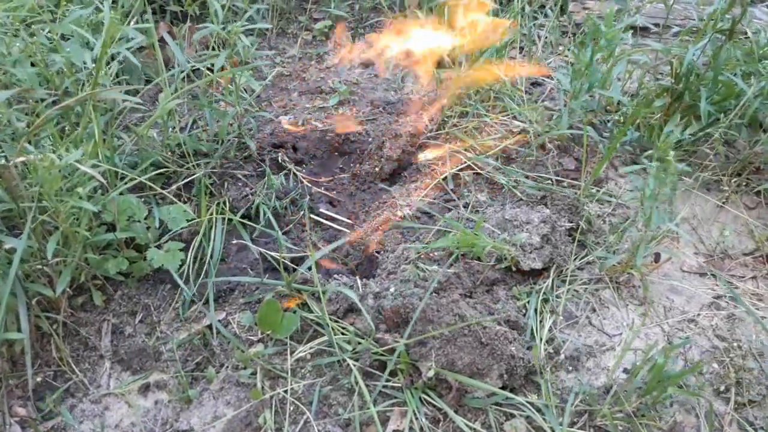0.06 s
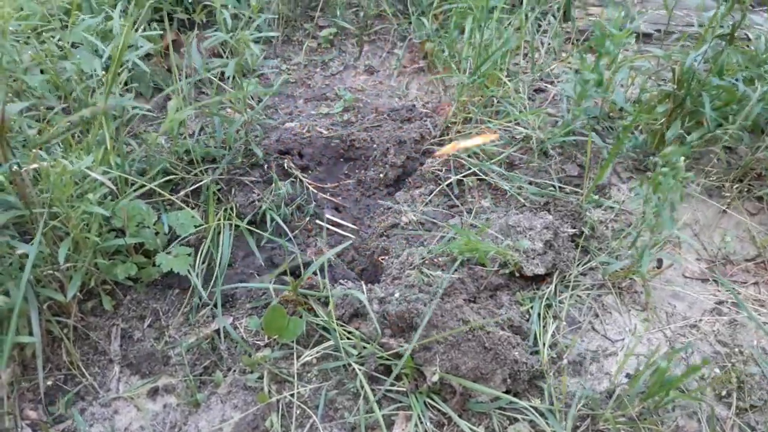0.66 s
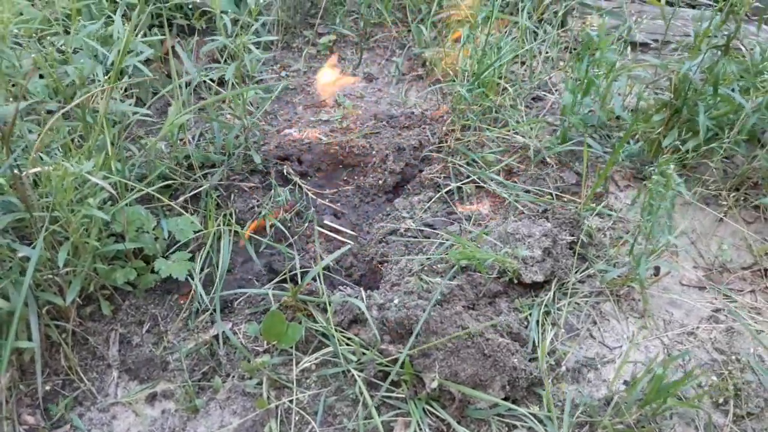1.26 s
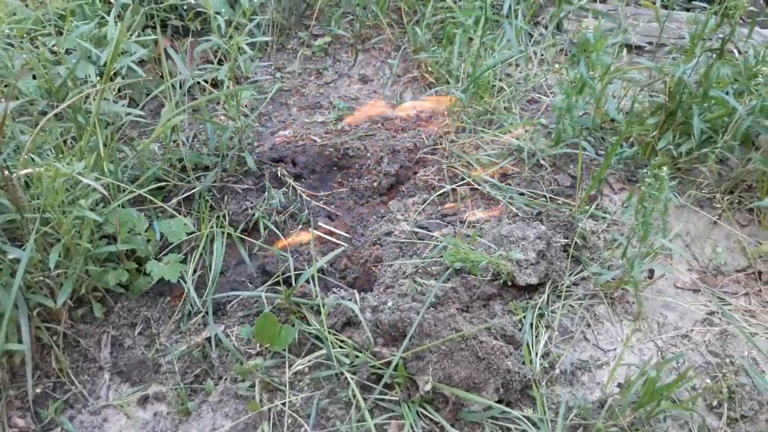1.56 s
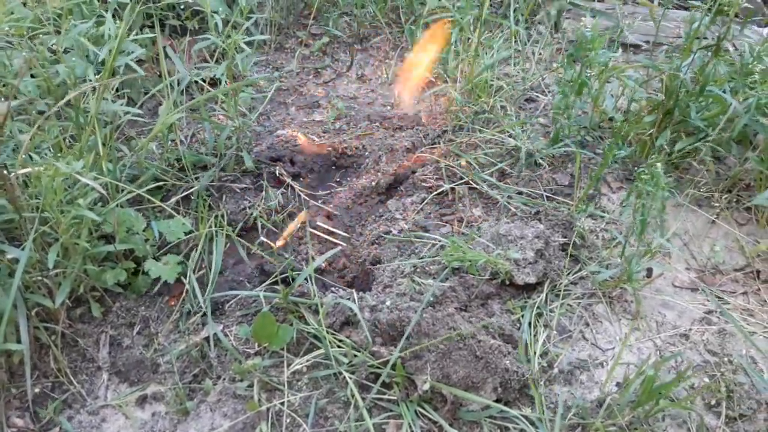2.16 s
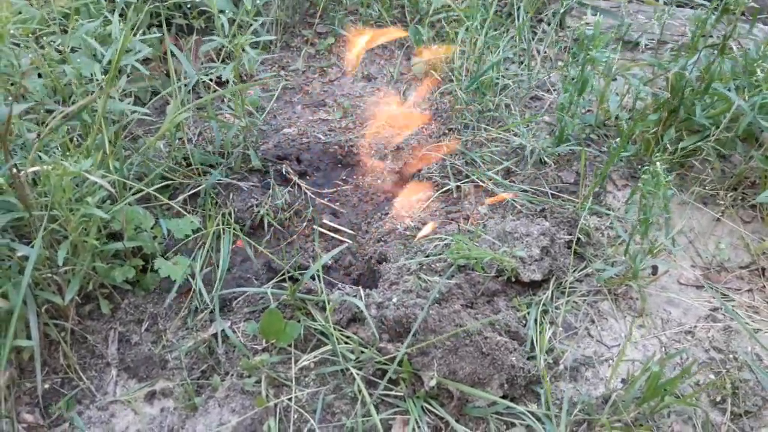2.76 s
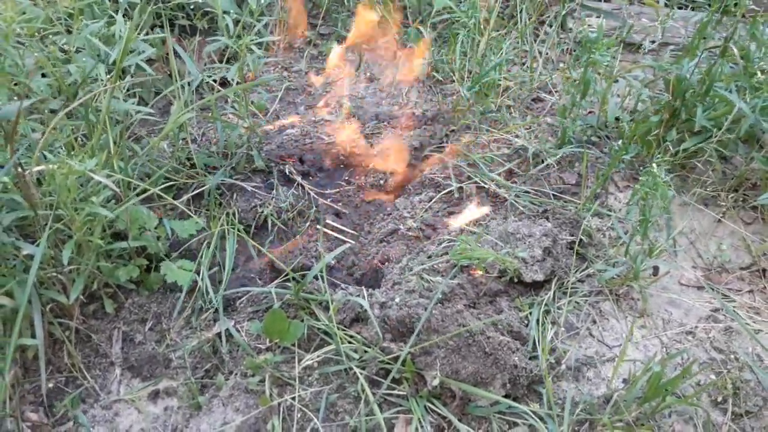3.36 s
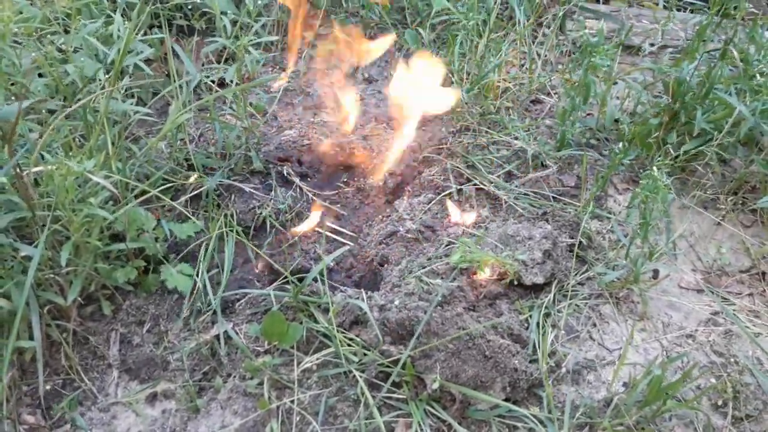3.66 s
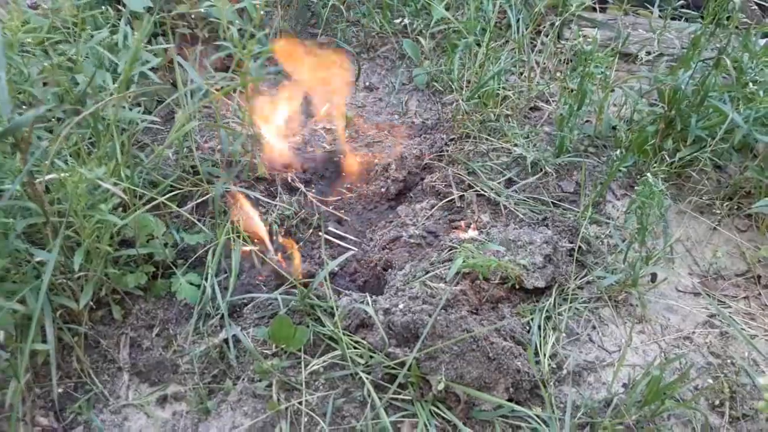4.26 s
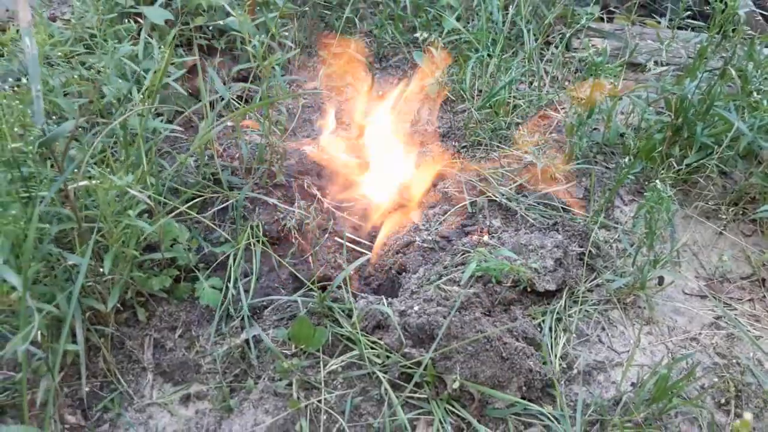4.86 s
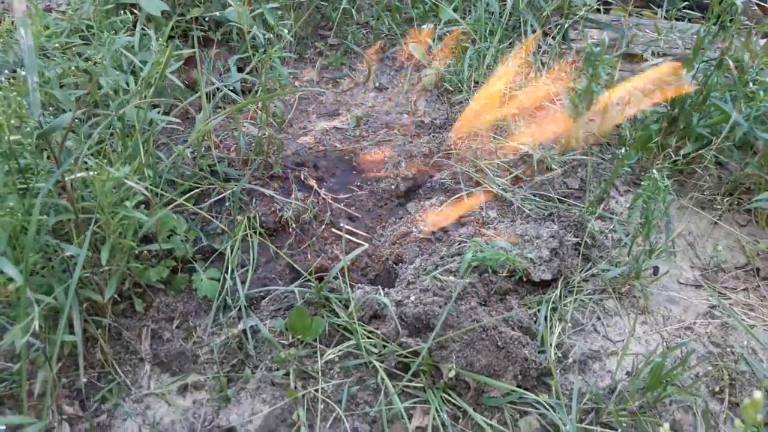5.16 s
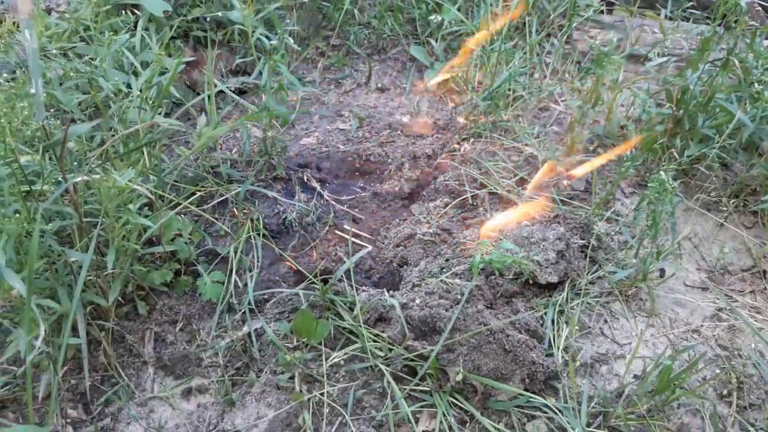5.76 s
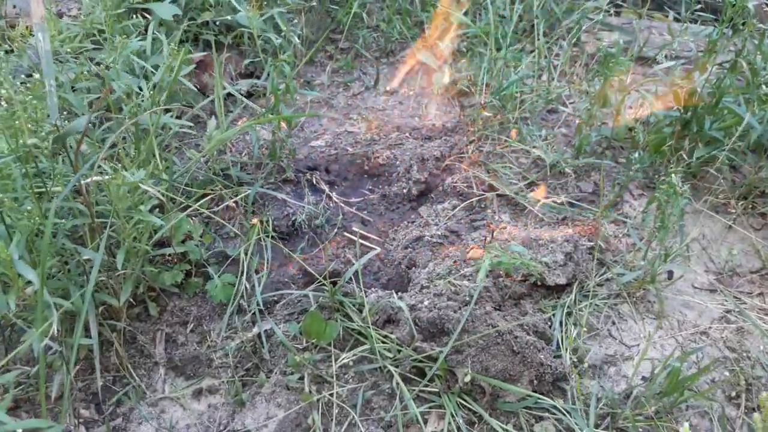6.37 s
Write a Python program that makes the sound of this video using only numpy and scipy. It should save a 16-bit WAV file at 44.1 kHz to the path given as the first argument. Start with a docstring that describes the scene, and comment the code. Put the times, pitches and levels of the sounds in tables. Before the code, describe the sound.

Spilled fuel burns on a mound of earth in a quiet garden, close to a hand-held microphone. The flames flutter and flare in low whooshes while stalks snap and damp grass sizzles faintly. Something scuffs briefly at the start. About halfway through, a cluster of low puffs builds to one loud thump as vapour ignites. The fire crackles on more softly, and near the end a hand rubs grittily over the microphone.

```python
"""Fuel fire in a garden

Spilled fuel burns on a mound of earth, close to the microphone of a hand-held camera. The flames
flutter and flare, and pockets of vapour ignite in low puffs; damp grass sizzles and stalks snap in the
heat, with a faint return from a wall a few metres off. Near the start something scuffs briefly;
near the end a hand rubs over the camera's casing, right at the microphone."""
import sys
import numpy as np
from scipy import signal
from scipy.fft import rfft, irfft
from scipy.io import wavfile
from scipy.ndimage import uniform_filter1d

SR = 44100
rng = np.random.default_rng(int(sys.argv[2]) if len(sys.argv) > 2 else 0)


def pcm_store(signal):
    """Save signal as 16-bit PCM."""
    levels = np.round(np.clip(np.atleast_2d(signal), -1, 1) * 32767)
    wavfile.write(sys.argv[1], SR, levels.astype(np.int16).T)


N = 287532
TIME = np.arange(N) / SR

# how strongly the fuel burns between flares: (time [s], level [dB])
BLAZE = [(0.0, -30.5), (0.36, -38), (0.95, -36.5), (2.52, -43.5), (2.94, -42.5), (3.3, -40.5), (3.56, -49),
         (3.92, -45.5), (4.99, -44), (6.1, -38), (6.52, -45)]
# tongues of flame that flare up: (peak time [s], length [s], rumble [dB], rush [dB])
FLARES = [(.09, 0.12, -38, -49), (.445, 0.045, -32, -45.5), (.6, 0.1, -31.5, -32.5), (.83, 0.088, -39, -36),
          (.92, 0.062, -34, -62), (1.637, 0.053, -44, -42), (1.725, 0.053, -50, -37),
          (2.665, 0.029, -45.5, -45), (3.06, 0.051, -38, -45), (3.18, 0.057, -53, -40.5),
          (3.255, 0.12, -36.5, -66), (3.372, 0.053, -22, -59), (3.57, 0.51, -37.5, -70),
          (3.735, 0.066, -30.5, -64), (4.505, 0.13, -44, -43), (4.611, 0.015, -59, -36),
          (5.135, 0.032, -33.5, -66), (5.37, 0.058, -45, -41.5), (5.61, 0.018, -56, -31),
          (5.73, 0.045, -37.5, -50), (6.415, 0.023, -61, -35.5), (6.495, 0.024, -47, -30.5)]
# spectra of the flames' rumble and rush, heard close up: (frequency [Hz], level [dB])
RUMBLE_COLOUR = [(22, -35), (42, -1.5), (70, 3.5), (105, 5), (240, -8), (340, -24.5), (700, -60)]
RUSH_COLOUR = [(90, -7), (230, 9.5), (400, -1), (600, 3), (900, -5.5), (2000, -11), (3200, -22.5),
               (9000, -25)]
def flames():
    """Unsteady burning close by: a fluttering rumble and a flapping rush follow the blaze and flares."""
    blaze = level(BLAZE)
    rumble_flare, rush_flare = swells(FLARES, rise=0.52)
    rumble_gain = np.hypot(amp(-8) * blaze, rumble_flare)
    rush_gain = np.hypot(amp(-7) * blaze, rush_flare)
    flutter = unit(colour(rng.standard_normal(N), RUMBLE_COLOUR))
    strength = np.sqrt(uniform_filter1d(flutter ** 2, size=1600) + 1e-6)
    rumble = unit(flutter / strength)  # the tongues flap at a fairly even strength within one flare
    flaps = amp(3.5 * wander(rate_hz=28))
    rush = unit(colour(rng.standard_normal(N) * flaps, RUSH_COLOUR))
    return rumble * rumble_gain + rush * rush_gain


# pockets of vapour that ignite at once: (time [s], level [dB], pitch [Hz])
PUFFS = [(0.1766, -19, 77), (0.451, -25, 85.5), (1.405, -24, 89), (1.726, -23.5, 150), (2.995, -27, 86.5),
         (3.1835, -16.5, 91), (3.2477, -15, 97), (3.307, -17.5, 87.4), (3.383, -7.5, 216),
         (3.3907, 2.5, 158), (3.428, -13, 226), (3.5826, -16, 106), (3.7256, -14.5, 90.5),
         (4.5146, -21.5, 235), (4.984, -22.5, 84)]
def puffs(spread_rad=2.05):
    """A pocket of gas expands and stops: the microphone gets a push, a pull and a weak rebound."""
    out = np.zeros(N)
    t = np.arange(-SR // 50, SR // 50) / SR
    for s, db, hz in PUFFS:
        phase = 2 * np.pi * hz * t
        pulse = -np.sin(phase) * np.exp(-(phase / spread_rad) ** 2)
        add(out, s + t[0], amp(db) * pulse)
    return out


# stalks that burst on the mound, and two knocks just after the scuff at 0.27 s: (time [s], sharp snap [dB],
# hollow pop [dB], tearing time [s])
CRACKLES = [(0.1277, -35.5, -35, 0.004), (0.268, -46, -35, .0003), (0.2726, -50, -30.5, 0.00033),
            (0.4335, -34, -40, 0.0019), (0.482, -35, -38.5, 0.00055), (0.5932, -32.5, -33.5, 0.00046),
            (0.658, -38, -38, 0.003), (0.7125, -20, -22, 0.00067), (0.7438, -23.5, -37, 0.00047),
            (0.9001, -40.5, -41, .003), (1.1231, -43, -44.5, 0.0041), (1.222, -48, -38.5, 0.0068),
            (1.2883, -38.5, -41.5, 0.001), (1.5313, -26.5, -17, 0.00097), (2.0586, -39.5, -44, 0.00025),
            (2.435, -39.5, -47.5, 0.00025), (2.5106, -45.5, -41.5, 0.00029), (2.5571, -36.5, -46, 0.00026),
            (3.094, -39, -44.5, 0.0056), (3.187, -31, -32, 0.0061), (3.318, -33, -39.5, 0.0061),
            (3.3994, -32.5, -31.5, 0.00032), (3.6974, -40, -48, 0.00031), (3.7959, -45, -45.5, 0.00016),
            (4.1271, -38.5, -40, 0.00093), (4.168, -41, -38.5, 0.0015), (4.457, -40.5, -39.5, 0.00082),
            (4.5474, -38.5, -48, 0.0043), (4.7155, -43.5, -39, 0.013), (4.7931, -32.5, -36, 0.0027),
            (4.8274, -32.5, -32.5, 0.0065), (5.2195, -47, -49, 0.00044), (5.489, -38, -39, 0.0016),
            (5.598, -40, -35, 0.0033), (5.655, -35.5, -39, 0.0015), (5.6797, -38.5, -44, 0.00075),
            (5.9522, -38.5, -36.5, 0.0003), (6.3523, -34, -37.5, 0.00061), (6.3606, -32, -40, 0.0005),
            (6.4653, -28.5, -37, 0.00014)]
# spectra of a stalk's snap and pop: (frequency [Hz], level [dB])
SNAP_COLOUR = [(500, -23), (2000, -34), (6500, -15), (9000, -19.5), (15800, -21.5)]
POP_COLOUR = [(150, -26), (500, -8.5), (950, -4), (1950, 1), (2700, -7), (4000, -11.5), (5800, -10),
              (8000, -29)]
def crackles(untilted_db=-33.5):
    """Steam bursts the stalks: a bright snap over a hollow pop; wet ones spit for longer."""
    out = np.zeros(N)
    for s, snap_db, pop_db, tear_s in CRACKLES:
        db_per_octave = 0.11 * (untilted_db - snap_db)  # thin stalks snap weaker and brighter
        tilted = [(hz, db + db_per_octave * np.log2(hz / SR)) for hz, db in SNAP_COLOUR]
        snap = burst(tilted, tear_s, spike=0.66, scatter_db=-18.5, scatter_s=0.0035)
        pop = burst(POP_COLOUR, tear_s, spike=3.0, scatter_db=-8, scatter_s=0.003)
        add(out, s, amp(snap_db) * snap + amp(pop_db) * pop)
    return out


def burst(spectrum, tear_s, spike, scatter_db, scatter_s):
    """One fracture: a spike, a short tearing, and scatter from the surfaces around it."""
    t = np.arange(2048) / SR
    tear, scatter = rng.standard_normal((2, len(t)))
    drive = tear * np.exp(-t / tear_s) + amp(scatter_db) * scatter * np.exp(-t / scatter_s)
    # bending waves spread the spike into a very short falling chirp
    progress = np.arange(12) / 12
    drive[:12] += spike * np.cos(np.pi * 12 * (1 - progress) ** 2 / 2)
    sound = colour(drive, spectrum)
    return sound / np.sqrt(np.mean(sound[:SR // 250] ** 2))  # rms 1 over the first 4 ms


# damp grass in the heat: (time [s], level [dB])
SIZZLE = [(0.0, -62), (0.68, -53.5), (1.45, -60), (1.68, -52), (3.2, -49.5), (3.48, -54), (4.03, -52.5),
          (4.31, -46.5), (5.18, -58), (6.05, -50), (6.52, -51)]
# spectrum of its hiss: (frequency [Hz], level [dB])
SIZZLE_COLOUR = [(600, -5.5), (1200, 7.5), (1900, 8), (2800, 1), (4800, -2.5), (15500, -12.5)]
def sizzle():
    """Moisture boils off the grass in a fine hiss, with faint ticks from the smallest fibres."""
    bubbles = grains(per_s=9000, spread_db=2)
    hiss = unit(colour(bubbles, SIZZLE_COLOUR)) * amp(1.8 * wander(rate_hz=31))
    fibres = grains(per_s=13, spread_db=2.5)
    snaps = amp(-11.5) * unit(colour(fibres, SNAP_COLOUR))
    pops = amp(-13) * unit(colour(fibres, POP_COLOUR))
    return (amp(-1.5) * hiss + snaps + pops) * level(SIZZLE)


def steam(jet_band_hz=(4960, 9920), squeak_hz=1840):
    """A high, spitting jet swells and sinks in the grass; later steam squeaks out of one stalk."""
    spits = grains(per_s=2500, spread_db=3)
    jet = unit(signal.lfilter(*signal.butter(1, jet_band_hz, "band", fs=SR), spits))
    squeak = unit(np.sin(2 * np.pi * squeak_hz * TIME + wander(rate_hz=200)))
    return (amp(-50.5) * jet * swell(peak_s=4.27, length_s=0.16, rise=0.52)
            + amp(-29) * squeak * swell(peak_s=5.2, length_s=0.0036, rise=0.52))


# strokes of the hand on the camera: (peak time [s], length [s], ring [dB], grit [dB], push [dB])
RUBS = [(6.02, 0.024, -44, -42, -43.5), (6.068, 0.015, -23, -40, -33), (6.116, 0.035, -29.5, -37.5, -54),
        (6.163, 0.044, -35, -43, -44), (6.2, 0.0096, -28, -16.5, -28), (6.216, 0.016, -26, -24.5, -33),
        (6.2215, 0.0074, -29, -40, -16.5), (6.242, 0.034, -38, -56, -33.5)]
# bits of grit that catch under the hand and give way: (time [s], level [dB])
CRUNCHES = [(6.0645, -36), (6.0925, -35), (6.1325, -33), (6.2155, -17.5), (6.2425, -32.5)]
# spectra of the gritty hiss and of the dull push on the microphone: (frequency [Hz], level [dB])
GRIT_COLOUR = [(400, -15), (2700, 5.5), (4400, -2), (7200, -13.5), (12400, 5.5), (15800, -10)]
PUSH_COLOUR = [(45, -38), (170, -14), (380, 5), (600, -6.5), (1500, -28.5)]
def hand_rubs(rise=0.48):
    """Handling noise: slips of skin ring the casing, grit crunches, the hand pushes on the microphone."""
    ring_gain, grit_gain, push_gain = swells(RUBS, rise)
    slips = grains(per_s=1800, spread_db=2.5)
    grip = swell(peak_s=6.211, length_s=0.034, rise=rise)  # bearing down lowers the resonances
    ring = np.sqrt(1 - grip ** 2) * casing(slips, tuning=0.91) + grip * casing(slips, tuning=0.862)
    # each bit of grit also stirs the casing's dense, quickly dying upper modes
    t = TIME[:SR // 20]
    upper_modes = rng.standard_normal(len(t)) * np.exp(-t / 0.003)
    upper_modes[0] += 8  # the click of contact
    contacts = signal.oaconvolve(grains(per_s=1200, spread_db=3), upper_modes)[:N]
    grit = unit(colour(contacts, GRIT_COLOUR))
    push = unit(colour(rng.standard_normal(N), PUSH_COLOUR))
    out = ring_gain * ring + grit_gain * grit + push_gain * push
    for s, db in CRUNCHES:
        crunch = burst(GRIT_COLOUR, tear_s=0.0029, spike=2, scatter_db=-20, scatter_s=0.005)
        add(out, s, amp(db) * crunch)
    return out


# resonances of the camera's casing before tuning: (frequency [Hz], width [Hz], level [dB])
CASING_MODES = [(206, 85, 13), (692, 80, 12), (1102, 74, 8), (1817, 58, 16.5), (2443, 38, 11.5),
                (2920, 19, 9), (3170, 14, 11)]
def casing(slips, tuning):
    """The casing rings around the microphone, all its resonances shifted by the factor tuning."""
    return unit(sum(amp(db) * signal.lfilter(*signal.iirpeak(hz * tuning, hz / width, SR), slips)
                    for hz, width, db in CASING_MODES))


# spectrum of the scuff: (frequency [Hz], level [dB])
SCUFF_COLOUR = [(380, -3), (510, 9), (1170, 4), (1650, -4), (2450, -4), (4000, -7.5), (7000, -24.5)]
def scuff(start_s=0.2288, hold_s=0.023, body_hz=1500, body_fade_db_per_s=480):
    """A short scrape made of dense slips: its rasp stops quickly, its hollow body rings on."""
    t = TIME - start_s
    fade = amp(-body_fade_db_per_s * np.clip(t - hold_s, 0, 1))
    slips = unit(colour(grains(per_s=4000, spread_db=2), SCUFF_COLOUR))
    body = signal.filtfilt(*signal.butter(2, body_hz, fs=SR), slips)
    rasp = slips - body
    return amp(-25) * (t > 0) * (body * fade + rasp * fade ** 3)


def garden_echo(x, tail_db, t60_s, wall_db, wall_s, smear_s):
    """Thin open-air tail, with a smeared return from a wall a few metres off."""
    t = np.arange(SR // 3) / SR
    tail = rng.standard_normal(len(t)) * amp(-60 * t / t60_s) * (t > 0.004)
    wall = rng.standard_normal(len(t)) * np.exp(-((t - wall_s) / smear_s) ** 2)
    response = amp(tail_db) * tail / np.linalg.norm(tail) + amp(wall_db) * wall / np.linalg.norm(wall)
    return signal.oaconvolve(x, response)[:N]


# spectrum of the garden's background: (frequency [Hz], level [dB])
GARDEN_COLOUR = [(40, -28), (200, 1.5), (530, -6), (800, -19.5), (7000, -22), (10000, -58)]
def garden_air():
    """The faint, steady hush of the garden behind the fire."""
    return amp(-52) * unit(colour(rng.standard_normal(N), GARDEN_COLOUR))


def amp(db):
    return 10 ** (np.asarray(db) / 20)


def unit(x):
    return x / np.sqrt(np.mean(x ** 2) + 1e-20)


def level(rows):
    """Gain over time from rows of (time [s], level [dB])."""
    s, db = np.transpose(rows)
    return amp(np.interp(TIME, s, db))


def add(mix, s, sound):
    part = mix[max(round(s * SR), 0):][:len(sound)]
    part += sound[:len(part)]


def colour(x, spectrum, size=4096):
    """Causal filter with the given spectrum, so that clicks keep their sharp front."""
    hz, db = np.transpose(spectrum)
    grid = np.fft.rfftfreq(size, 1 / SR)
    gain = amp(np.interp(np.log(grid + 1), np.log(hz), db))
    cepstrum = irfft(np.log(gain))
    cepstrum[1:size // 2] *= 2  # fold to minimum phase
    cepstrum[size // 2 + 1:] = 0
    response = irfft(np.exp(rfft(cepstrum)))[:size // 2]
    return signal.oaconvolve(x, response)[:len(x)]


def wander(rate_hz):
    """Smooth random drift of rms 1."""
    hz = np.fft.rfftfreq(N, 1 / SR)
    return unit(irfft(rfft(rng.standard_normal(N)) * np.exp(-(hz / rate_hz) ** 2), N))


def grains(per_s, spread_db):
    """Random tiny impulses, most small and a few large."""
    size = amp(spread_db * np.minimum(rng.exponential(1, N), 3))
    return unit(rng.choice([-1, 1], N) * size * (rng.random(N) < per_s / SR))


def swell(peak_s, length_s, rise):
    """Gain that peaks at 1 and stays above half power for length_s, the share rise of it swelling."""
    side_s = length_s * np.where(TIME < peak_s, rise, 1 - rise)
    return 2 ** -np.minimum(0.5 * ((TIME - peak_s) / side_s) ** 2, 100)


def swells(rows, rise):
    """One gain per level column of (peak time [s], length [s], levels [dB]); overlaps add in power."""
    return np.sqrt(sum((amp(dbs)[:, None] * swell(s, length, rise)) ** 2 for s, length, *dbs in rows))


def scene():
    """Close fire and handling noise over the air of the garden, alike in both channels."""
    sharp = crackles() + scuff()
    echo = garden_echo(sharp, tail_db=-16, t60_s=0.06, wall_db=-16.5, wall_s=0.029, smear_s=0.0067)
    background = echo + garden_air()
    mono = flames() + puffs() + sizzle() + steam() + sharp + hand_rubs() + background
    return np.array([mono, mono])


# response of the microphone's sound port: (frequency [Hz], gain [dB])
PORT_COLOUR = [(5700, 0), (7350, 7), (8300, -5), (10300, 0), (12500, 2.5)]
def record(dry):
    """The camera's microphone sheds the deepest bass, rings at its port and cuts the highest treble."""
    low_cut_hz, high_cut_hz = 52, 16050
    thin = signal.sosfilt(signal.butter(2, low_cut_hz, "high", fs=SR, output="sos"), dry)
    heard = np.array([colour(channel, PORT_COLOUR) for channel in thin])
    band_limit = signal.firwin(201, high_cut_hz, window=("kaiser", 8), fs=SR)
    return signal.oaconvolve(heard, band_limit[None], "same")


dry = scene()
out = record(dry)
pcm_store(out)
```